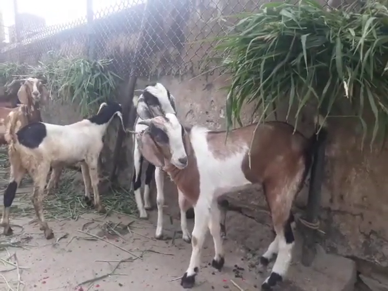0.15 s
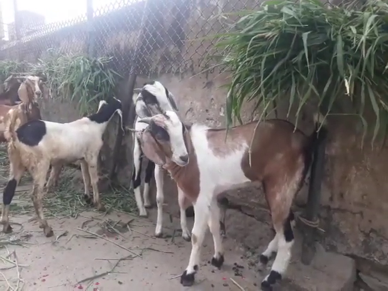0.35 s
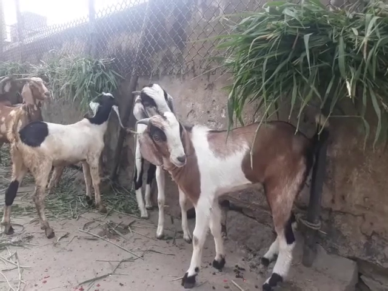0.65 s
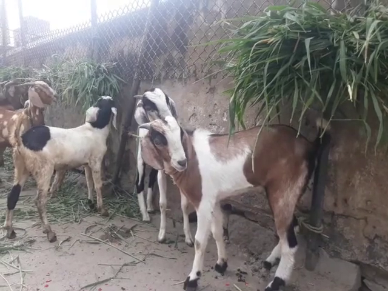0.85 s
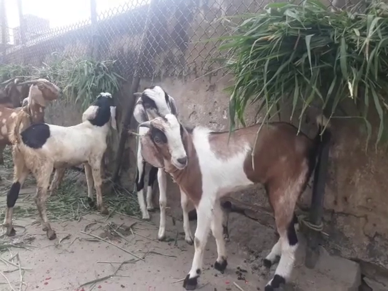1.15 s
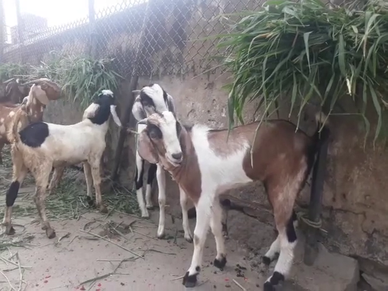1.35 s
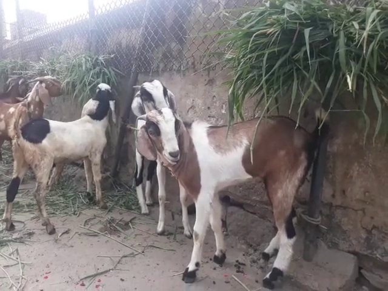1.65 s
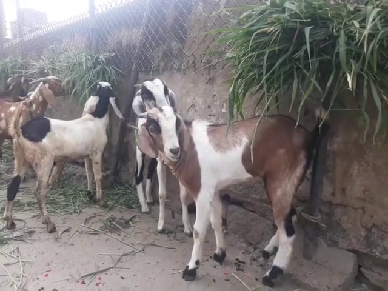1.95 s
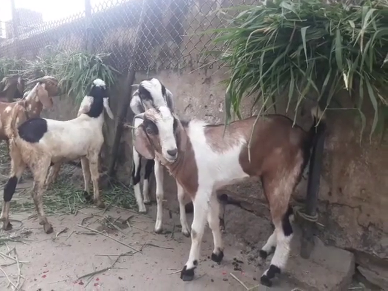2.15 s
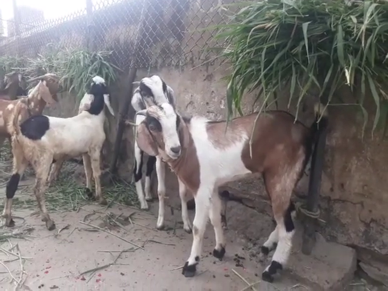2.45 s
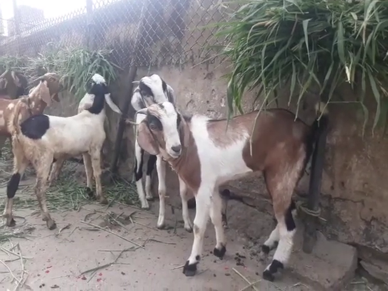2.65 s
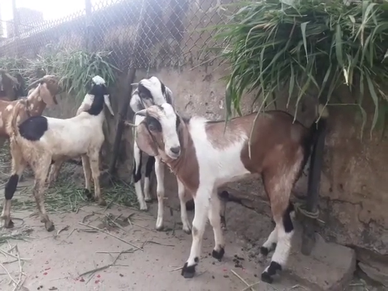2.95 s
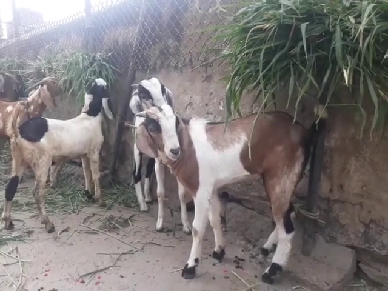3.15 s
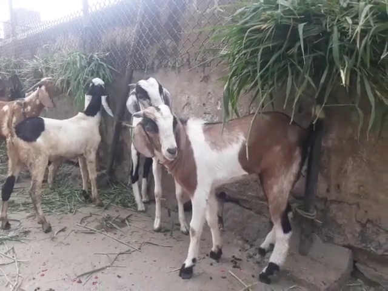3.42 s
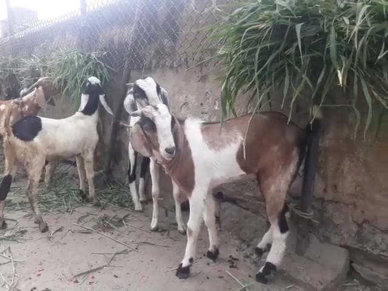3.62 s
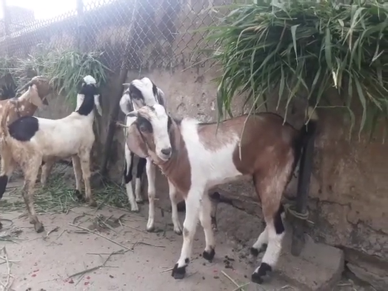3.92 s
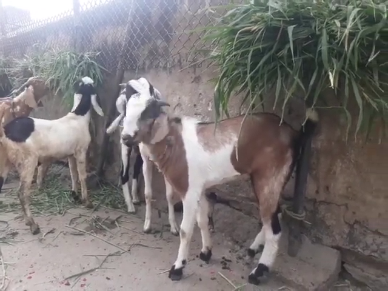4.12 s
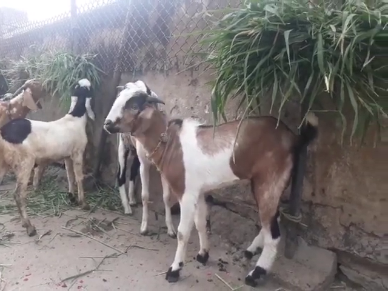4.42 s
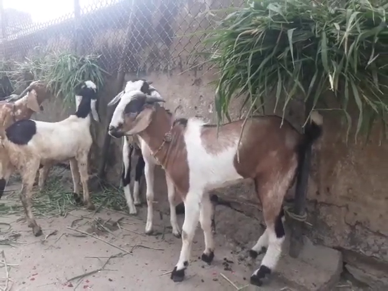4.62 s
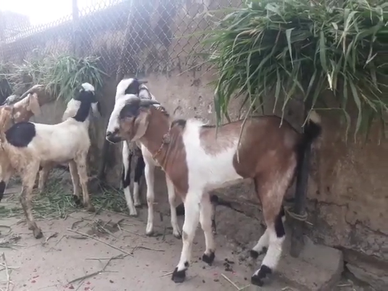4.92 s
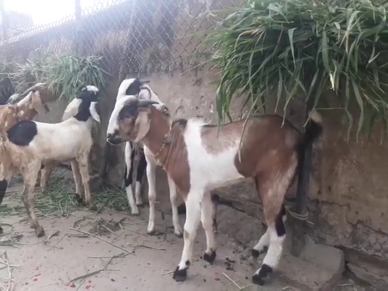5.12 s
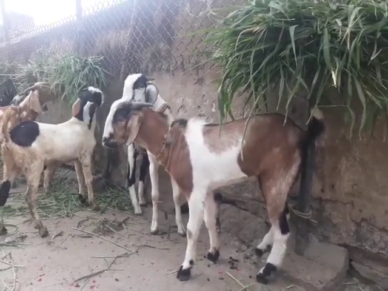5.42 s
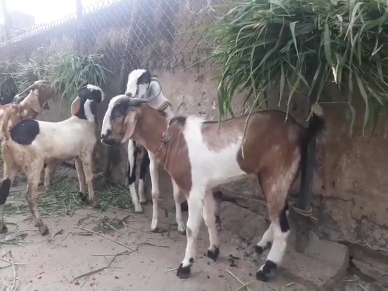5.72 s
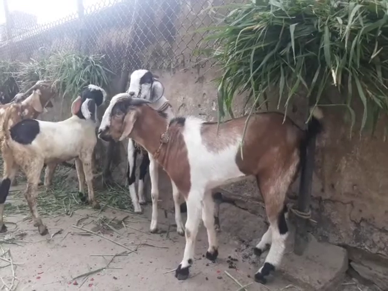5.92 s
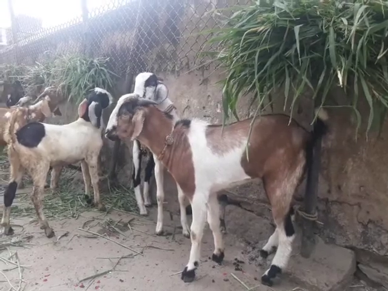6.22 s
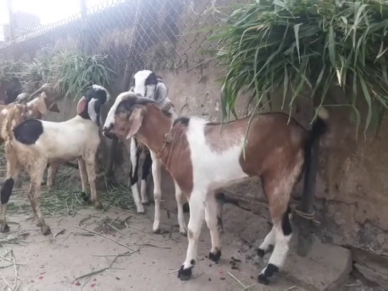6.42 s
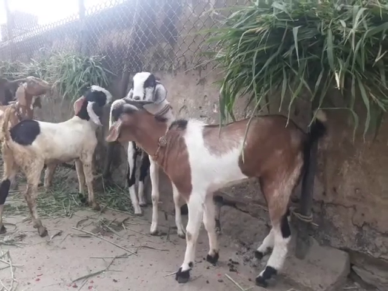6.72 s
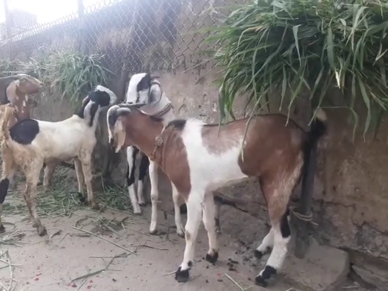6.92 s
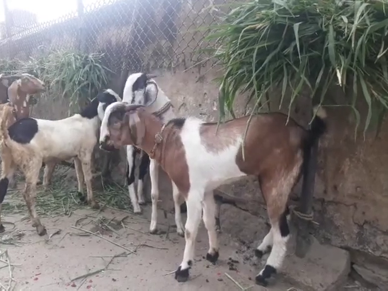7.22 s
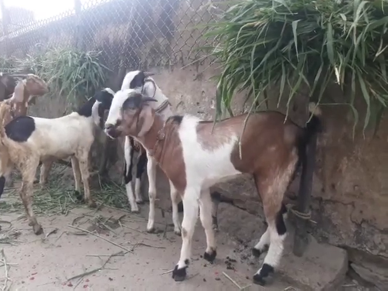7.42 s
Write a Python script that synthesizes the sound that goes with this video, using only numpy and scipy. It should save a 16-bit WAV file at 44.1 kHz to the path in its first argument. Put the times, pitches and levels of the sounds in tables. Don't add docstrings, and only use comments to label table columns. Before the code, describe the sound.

In a walled goat pen, a loud trembling bleat gives way to twig snaps and broom scratches, ending with rattling board knocks and another bleat.

```python
import sys
import numpy as np
from scipy import signal
from scipy.fft import rfft, irfft, next_fast_len
from scipy.io import wavfile
from scipy.ndimage import uniform_filter1d, minimum_filter1d

SR = 44100
rng = np.random.default_rng(int(sys.argv[2]) if len(sys.argv) > 2 else 0)


def linear_from_db(decibels):
    return 10 ** (np.asarray(decibels, float) / 20)


def transcribe(u):
    v = np.clip(np.atleast_2d(u).T, -1, 1)
    q = np.round(v * 32767).astype(np.int16)
    wavfile.write(sys.argv[1], SR, q)


N = 333341

# t/s, gain level/dB
GAIN = [(0, 7.5), (.06, 0.5), (.5, 1), (1.0, 1.5), (1.25, 1.5), (1.5, -6.5), (2.13, -15), (2.4, -14),
        (2.78, -14), (2.97, -4.5), (3.33, -1), (4.3, -1.5), (4.6, -1), (5.9, 1), (6.36, -0.5), (6.8, 1),
        (7.15, -0.5), (7.4, 0)]
# f/Hz, level per Hz/dB
RUMBLE_COLOUR = [(82, -14.5), (140, -1.5), (253, -9.5), (381, -10), (451, -13.5), (688, -13), (795, -14),
                 (1180, -17.5), (1700, -22), (2500, -28), (3250, -35), (5500, -120)]
HISS_COLOUR = [(880, -23), (1500, -10.5), (1680, -15.5), (2140, -9.5), (3270, -1), (3850, 5), (6020, -8),
               (7830, -3.5), (8330, -5.5), (9500, -31.5), (12400, -18), (20900, -120)]
SPRAY_COLOUR = [(4000, -19.5), (5500, -5.5), (6900, -7), (7600, 2.5), (8300, -2), (9600, -15.5),
                (12800, -12), (15000, -11.5), (15800, -10), (16200, -32)]
ENGINE_COLOUR = [(28, -46), (42, -10), (65, -1), (82, -28.5), (108, 9), (125, 0), (160, -29.5)]

# start t/s, length/s, f/Hz, level/dB
RINGS = [(.001, 0.48, 452.5, -48.5), (.01, 0.18, 679, -52), (1.79, 0.23, 1357, -65),
         (3.39, 0.35, 3196, -53.5), (3.62, 0.58, 3200, -54.5), (4.0, 0.29, 3170, -51),
         (4.85, 0.31, 1300, -61), (5.112, 0.026, 3290, -45)]
# start t/s, length/s, top f/Hz, level/dB
CHIRPS = [
    (2.645, 0.029, 5300, -50),
    (2.878, 0.024, 7240, -49),
    (4.057, 0.027, 5270, -38.5),
]
# start t/s, length/s, start f/Hz, end f/Hz, level/dB
SQUEAKS = [
    (5.928, 0.019, 1215, 1380, -31.5),
    (5.93, 0.023, 2390, 2800, -38),
    (5.946, 0.02, 1510, 2040, -36.5),
    (5.945, .016, 3010, 3870, -37),
]

# t/s, peak level/dB
THICK_TWIGS = [(.818, -36), (2.1176, -33), (2.928, -29), (.984, -15), (2.7994, -36), (2.8344, -38),
               (3.3857, -21.5), (3.6044, -54), (4.4014, -25), (4.6977, -13), (4.7207, -16), (4.7406, -12.5),
               (5.9005, -15), (6.3964, -19)]
THIN_TWIGS = [(2.5094, -43), (2.7492, -35), (2.7836, -33), (3.3644, -27), (3.4862, -13), (3.8214, -25),
              (4.1764, -26), (4.2705, -29.5), (5.9286, -16)]
STRAW = [(.008, -23.5), (.165, -35), (.2678, -46), (.3277, -33), (.4204, -30), (.4798, -34), (.6025, -36),
         (.7357, -34), (.7786, -31), (.814, -33), (.8836, -29), (.9832, -36.5), (2.7495, -49),
         (2.7824, -43), (2.7994, -37), (3.3857, -32), (4.4014, -38), (4.6977, -16), (4.7406, -30.5),
         (3.604, -31), (3.645, -39), (3.824, -30), (3.933, -37), (2.1176, -50),
         (2.9744, -45), (3.1198, -27), (3.1544, -24), (3.1694, -33), (3.2999, -41), (3.3144, -41),
         (3.3214, -38), (3.3568, -37), (3.4994, -35), (3.5244, -37), (3.5644, -44), (4.5141, -36),
         (4.7207, -27)]
# t/s, peak level/dB, f/Hz
HOOVES = [(4.697, -25, 1990), (4.743, -23.5, 1270), (4.759, -27, 1110), (5.129, -40, 1300),
          (5.28, -37, 1230), (5.384, -25.5, 1320), (5.476, -31, 1270), (5.561, -35, 1290), (5.79, -37, 790),
          (6.078, -16.5, 1390), (6.459, -20, 2560), (6.468, -30, 1230)]

# start t/s, length/s, start f/Hz, end f/Hz, level/dB
RASPS = [(0.486, 0.091, 4590, 3730, -21.5), (5.42, 0.14, 3860, 3660, -26),
         (5.464, 0.065, 4230, 4500, -23.5), (5.521, .08, 4400, 4300, -31.5), (2.93, .05, 7000, 7000, -42),
         (3.09, 0.12, 4100, 3940, -32), (3.675, 0.053, 7200, 7300, -32), (3.687, 0.056, 5900, 5700, -27),
         (3.825, 0.063, 7200, 7400, -30), (5.3, 0.054, 6700, 7700, -28), (4.775, 0.037, 7000, 7100, -28)]
# start t/s, full-pressure length/s, level near 4 kHz/dB, level near 7 kHz/dB, top level/dB
SWEEPS = [(1.808, 0.046, -37, -36, -65.5), (1.952, 0.07, -37.5, -39.5, -60),
          (2.119, 0.049, -37, -38.5, -73), (2.933, 0.044, -32.5, -29, -53),
          (3.102, 0.068, -26.5, -28.5, -34.5), (3.298, .062, -65, -60, -44), (3.489, 0.024, -46, -41, -35),
          (3.68, 0.069, -29, -23.5, -43), (3.819, 0.047, -27.5, -22, -41), (4.768, 0.05, -27, -24, -51),
          (5.298, 0.075, -29, -25.5, -45), (5.433, 0.14, -27, -47, -60), (5.918, 0.06, -34.5, -37, -29.5)]
# f/Hz, level per Hz/dB
BRISTLE_LOW = [(1500, -35.5), (2800, -12), (3300, -2.5), (4100, 3.5), (4900, -2.5), (6500, -32),
               (12000, -50)]
BRISTLE_HIGH = [(2000, -29), (4000, -21), (5400, -5.5), (7200, 0), (8300, -9), (9300, -25), (12000, -37),
                (16000, -60)]
BRISTLE_TOP = [(1000, -23), (2500, -14), (8000, 3), (10000, -10), (13000, -7), (15800, -11), (16500, -40)]

# t/s, level/dB, brightness/dB, bass/dB, ring time/factor
KNOCKS = [
    (.004, -26, -11.5, 0.5, 0.53),
    (1.909, -47.5, 5, 0.5, 1.64),
    (6.643, -12, 6, 4, 0.95),
    (7.088, -7.5, 1.5, -2, 0.93),
    (7.451, -5, -3, -4, 0.85),
]
SLAP_DB = [
    -41,
    -60.5,
    -2,
    1.5,
    -1,
]
# delay t/s, f/Hz, width/Hz, level/dB
REBOUNDS = [(.0025, 800, 500, -11.5), (.0045, 330, 170, 0), (.0085, 1500, 900, -4), (.017, 300, 200, -0.5),
            (0.0231, 420, 260, -3), (.003, 198.4, 20, -11.5), (.004, 351, 23, -13)]
# f/Hz, level per Hz/dB
BOARD_COLOUR = [(18, -54.5), (76, -9), (173, 2.5), (246, -1), (317, 2.5), (1320, -21.5), (1620, -23),
                (2130, -34.5), (3690, -37), (8030, -50.5), (12000, -63), (15600, -79), (22000, -120)]
# f/Hz, t/s
BOARD_T60 = [(60, 0.59), (160, 0.47), (420, 0.39), (1100, 0.52), (2500, 0.73), (8000, 0.15)]
# f/Hz, width/Hz, level/dB
BOARD_MODES = [(129, 27, -1.5), (196, 18, 4), (296, 40, 1.5), (355, 30, 3.5), (437, 30, -27),
               (654, 35, 0.5)]

# t/s, pitch f/Hz, mouth opening/0-1, tongue lift of the mode near 3 kHz/share
FAR_PITCH = [(.06, 409.5, 0.2, .01), (.19, 408.6, 0.33, .01), (.28, 422.6, 0.77, .01),
             (.47, 440.7, 0.72, .01), (.72, 394, 0.52, 0.0085)]
NEAR_PITCH = [(.9, 220.1, 0.46, 0.17), (1.0, 272.4, 0.25, 0.061), (1.07, 284, 0.26, 0.026),
              (1.19, 304.6, 0.05, 0.018), (1.325, 294.2, 0, 0.0045), (1.39, 316.5, 0.83, 0.0012),
              (1.55, 320.7, 1, 0.014), (1.715, 309.7, 0.96, 0.013), (1.79, 245.4, 0.26, 0.022)]
LAST_PITCH = [(6.92, 270, 0.046, .03), (6.96, 267, 0.067, 0.046), (7.05, 296.9, 0.033, 0.0079),
              (7.15, 308.1, 0.18, 0.029), (7.26, 314.4, .15, -0.012), (7.31, 309.2, 1, -0.036),
              (7.375, 315.8, 0.95, -0.029), (7.42, 300, 0.85, 0.043), (7.555, 292.4, 0.38, .02)]
# t/s, pitch f/Hz
NEAR_TUNE = [
    [(0.99, 258), (1.008, 282.3), (1.066, 282.3), (1.092, 296), (1.1, 312.3), (1.122, 316), (1.136, 275.7),
     (1.15, 280.5)],
    [(1.16, 297), (1.188, 320.8), (1.2, 305.5), (1.224, 331), (1.244, 298.2), (1.292, 306), (1.316, 293.6),
     (1.33, 294)],
    [(1.34, 301), (1.35, 299.4), (1.378, 316.6), (1.418, 310.7), (1.438, 334), (1.462, 307), (1.482, 332.7),
     (1.5, 313)],
    [(1.51, 309.4), (1.534, 341.7), (1.546, 325.8), (1.576, 324), (1.606, 310), (1.626, 332.4),
     (1.64, 311.5), (1.66, 315)],
    [(1.67, 311.4), (1.684, 317.8), (1.7, 296), (1.71, 309.5), (1.718, 306.8), (1.776, 244.5),
     (1.79, 246.6)],
]
LAST_TUNE = [
    [(6.92, 270), (6.98, 272.7), (6.998, 311.2), (7.006, 294.2), (7.075, 296)],
    [(7.13, 296.5), (7.15, 308), (7.18, 298)],
    [(7.21, 309), (7.22, 307.5), (7.23, 318.3), (7.29, 304.5), (7.3, 314.5)],
    [(7.31, 305.5), (7.38, 317.8), (7.42, 296), (7.44, 299)],
    [(7.51, 308.6), (7.54, 291), (7.55, 292.6)],
]
# start t/s, length/s, level/dB, level of the gap after/dB
FAR_QUAVERS = [(0.088, 0.027, -31, -47.5), (0.169, 0.035, -31.5, -48.5), (0.259, 0.031, -28, -38.5),
               (0.357, 0.035, -26, -35.5), (0.446, 0.039, -26, -34.5), (0.544, 0.0273, -29, -35),
               (0.64, 0.022, -30.5, -39.5)]
NEAR_QUAVERS = [(0.918, 0.027, -30, -42), (.985, 0.013, -27, -15.5), (1.007, 0.027, -12, -32),
                (1.052, 0.019, -23, -24), (1.093, 0.012, -12, -21), (1.121, 0.016, -11.5, -35.5),
                (1.17, 0.029, -9.5, -15.5), (1.21, 0.011, -7, -23.5), (1.261, 0.048, -9.5, -18),
                (1.343, 0.067, -8.5, -22), (1.427, 0.079, -8, -20), (1.531, 0.064, -7, -24),
                (1.616, 0.0068, -15.5, -15.5), (1.647, 0.038, -8.5, -31.5), (1.712, 0.021, -22, -30),
                (1.75, 0.01, -30.5, -48)]
LAST_QUAVERS = [(6.936, 0.031, -28.5, -36.5), (7.041, 0.026, -21, -32.5), (7.14, 0.033, -20.5, -36.5),
                (7.23, 0.032, -21, -31), (7.32, 0.04, -12, -27), (7.423, 0.0347, -16, -37),
                (7.529, 0.017, -21, -28)]
# f/Hz mouth narrow, f/Hz mouth wide, width/Hz, level/dB narrow, level/dB wide
FAR_THROAT = [(880, 940, 420, -24, -14.5), (1950, 2070, 125, -9, -3.5), (3300, 3220, 380, -2, -2.5),
              (3800, 4620, 470, 9, 1.5), (5170, 5500, 510, -13, -5), (6900, 6540, 630, 5, -12),
              (8100, 7700, 630, -15, -8.5)]
NEAR_THROAT = [(370, 526, 130, -15.5, -27), (1240, 1130, 236, -22.5, -31), (1540, 1560, 96, -21.5, -36),
               (2157, 2204, 183, -9, -18), (3265, 3100, 350, -1.5, -9), (4110, 3845, 306, -7.5, -1),
               (4870, 4740, 450, -12.5, -11), (5540, 5700, 270, -18, -18.5), (6580, 6650, 230, -29, -16),
               (8210, 7800, 910, -27.5, -29), (10100, 9800, 800, -43, -50.5), (11300, 10840, 560, -35, -40),
               (13100, 12000, 930, -42.5, -44.5), (15100, 15100, 900, -36, -44.5)]
LAST_THROAT = [(550, 689, 210, -11, -45), (1190, 1350, 195, -2, -20), (2194, 2090, 220, 2.5, -13),
               (3200, 3070, 415, 6.5, -9.5), (4160, 3930, 257, 3.5, 6), (4920, 4840, 550, -2, 1),
               (7000, 6470, 240, -12, -3.5), (8260, 8000, 940, -10.5, -9), (10900, 11000, 580, -23, -23),
               (12670, 12800, 750, -31, -36), (15060, 14300, 1000, -26, -35)]
# f/Hz, width/Hz, depth/0-1 mouth narrow, depth/0-1 mouth wide
NOSE = [(4700, 190, 0.7, .2), (1800, 280, 0, 0.57), (2670, 190, 0, 0.28)]
# delay t/s, level/dB
ECHOES = [(.0013, -23), (.0047, -13.5), (.009, -22), (.015, -18.5), (0.022, -26)]


def evened(x):
    return x / np.sqrt(np.mean(x ** 2) + 1e-20)


def drift(size, *spans):
    x = rng.standard_normal(size)
    for span in spans:
        x = uniform_filter1d(x, size=span)
    return evened(x)


def read(points, hz):
    f, value = np.transpose(points)
    return np.interp(np.log(hz + 1), np.log(f + 1), value)


def add(mix, s, sound):
    part = mix[round(max(s, 0) * SR):][:len(sound)]
    part += sound[:len(part)]


def resonate(x, hz, *widths):
    turn = np.exp(2j * np.pi * np.cumsum(hz * np.ones(len(x))) / SR)
    z = x / turn
    for r in np.exp(-np.pi * np.abs(widths) / SR):
        z = signal.lfilter([1 - r], [1, -r], z)
    return 2 * (turn * z).real


def coloured(points, x):
    hz = np.fft.rfftfreq(len(x), 1 / SR)
    return evened(irfft(rfft(x) * linear_from_db(read(points, hz)), len(x)))


def patchy_noise(points, patchy_db):
    hop = 64
    hz = np.fft.rfftfreq(256, 1 / SR)[:, None]
    a, b, patches = rng.standard_normal((N // hop + 5, len(hz), 3)).T
    patches = uniform_filter1d(patches, size=5, axis=0)
    patches = evened(uniform_filter1d(patches, size=30, axis=1))
    z = (a + 1j * b) * linear_from_db(read(points, hz) + patchy_db * patches)
    return evened(signal.istft(z, nperseg=256, noverlap=256 - hop)[1][:N])


def rumble(gain_db):
    return coloured(RUMBLE_COLOUR, rng.standard_normal(N)) * linear_from_db(-44 + gain_db)


def hiss(gain_db):
    return patchy_noise(HISS_COLOUR, 1.4) * linear_from_db(-40 + 1.34 * gain_db)


def water(t, gain_db):
    trickle_db, spray_db, opens_s, turn_s = -52, -34.5, 4.416, 0.28
    opening = np.sqrt(np.clip((t - opens_s) / turn_s, 0, 1))
    water_db = trickle_db + (spray_db - trickle_db) * opening
    return patchy_noise(SPRAY_COLOUR, 2.2) * linear_from_db(water_db + 0.71 * gain_db)


def engine(t, gain_db):
    leaves_s, fade_db_per_s, far_db = 4.93, -18, -15
    away_db = np.clip((t - leaves_s) * fade_db_per_s, far_db, 0)
    return coloured(ENGINE_COLOUR, rng.standard_normal(N)) * linear_from_db(-47.5 + away_db + 1.2 * gain_db)


def yard():
    t = np.arange(N) / SR
    gain_db = np.interp(t, *np.transpose(GAIN))
    return rumble(gain_db) + hiss(gain_db) + water(t, gain_db) + engine(t, gain_db)


def bending_tone(length, hz0, hz1, hz2, db, flutter_db):
    u = np.linspace(-1, 1, round(length * SR))
    hz = hz1 + (hz2 - hz0) / 2 * u + ((hz0 + hz2) / 2 - hz1) * u ** 2
    flutter = linear_from_db(flutter_db * drift(len(u), 300))
    tone = np.sqrt(2) * np.sin(2 * np.pi * np.cumsum(hz) / SR)
    return linear_from_db(db - 28.4 * length * u) * flutter * tone * signal.windows.tukey(len(u), .4)


def pail_and_wire():
    out = np.zeros(N)
    for s, length, hz, db in RINGS:
        add(out, s, bending_tone(length, hz, hz, hz, db, 2.5))
    return out


def sparrows():
    out = np.zeros(N)
    for s, length, hz, db in CHIRPS:
        add(out, s, bending_tone(length, .88 * hz, hz, 0.64 * hz, db, 3.5))
    return out


def hinge():
    out = np.zeros(N)
    for s, length, hz0, hz2, db in SQUEAKS:
        add(out, s, bending_tone(length, hz0, np.sqrt(hz0 * hz2), hz2, db, 2.5))
    return out


def snap(db, hz, width, decay_s):
    t = np.arange(1300) / SR
    crack = 1.3 * np.exp(-t / .0007)
    burst = rng.standard_normal(len(t)) * (np.exp(-t / decay_s) + crack)
    sound = resonate(burst, hz, width, 0.63 * width)
    return linear_from_db(db - 2.5) * sound / abs(sound).max()


def twigs_and_straw():
    out = np.zeros(N)
    kinds = [(THICK_TWIGS, 4430, 2900), (THIN_TWIGS, 8040, 1900), (STRAW, 11400, 6500)]
    for table, hz, width in kinds:
        for s, db in table:
            add(out, s, snap(db, hz, width, 0.0061))
    return out


def hooves():
    out = np.zeros(N)
    for s, db, hz in HOOVES:
        width = 0.95 * hz * linear_from_db(1.1 * (db + 25.0))
        add(out, s, snap(db, hz, width, 0.01))
    return out


def rasps():
    out, width = np.zeros(N), 350
    for s, length, hz0, hz1, db in RASPS:
        u = np.linspace(0, 1.5, round(1.3 * length * SR))
        hz = hz0 + (hz1 - hz0) * np.minimum(u, 1)
        scrape = evened(resonate(rng.standard_normal(len(u)), hz, width, 1.3 * width))
        add(out, s, scrape * linear_from_db(db - 8.5 * u ** 2) * signal.windows.tukey(len(u), .45))
    return out


def broom():
    out, t = np.zeros(N), np.arange(SR // 2) / SR
    t60_s = 0.52
    for s, length, low_db, high_db, top_db in SWEEPS:
        grains = rng.standard_normal(len(t)) * linear_from_db(1.1 * drift(len(t), 90))
        low = coloured(BRISTLE_LOW, grains)
        high = coloured(BRISTLE_HIGH, grains)
        top = coloured(BRISTLE_TOP, grains)
        low = low + 0.23 * evened(resonate(grains, 3950, 750, 1050))
        fine_db = np.interp(t, [0, .028, .036, .025 + length, 0.037 + length], [-3, -2, 1.5, -1.5, -4])
        top = top * linear_from_db(fine_db + 2.0 * drift(len(t), 250))
        press_at = [0, .03, 0.0026 + length, 0.01 + length + t60_s]
        press_db = np.interp(t, press_at, [-18.5, -3.5, -4.0, -73.0])
        stroke = linear_from_db(low_db) * low + linear_from_db(high_db) * high + linear_from_db(top_db) * top
        add(out, s - .015, linear_from_db(press_db) * stroke)
    return out


def board_body(bright_db, bass_db, ring):
    size = SR // 2
    hz, t = np.fft.rfftfreq(size, 1 / SR), np.arange(size) / SR
    bounce = 1.7 * np.exp(-((t - .02) / 0.00036) ** 2)
    shake = rng.standard_normal(size) * (1 + 0.4 * np.exp(-t / 0.0074) + bounce)
    modes = evened(sum(linear_from_db(db) * evened(resonate(shake, f, width)) for f, width, db in BOARD_MODES))
    modes = coloured([(30, -16), (90, 6.5), (700, 0.0), (1500, -43)], modes)
    z = rfft(coloured(BOARD_COLOUR, shake) + 0.32 * modes)
    z = z * linear_from_db(bright_db * np.log2(1 + hz / 500) + bass_db / (1 + (hz / 200) ** 4))
    body = np.zeros(size)
    edges = np.geomspace(30, 16000, num=12)
    for lo, hi in zip(edges, edges[1:]):
        band = irfft(z * ((hz >= lo) & (hz < hi)), size)
        band = band * linear_from_db(-60 * t / (ring * read(BOARD_T60, lo)))
        if 600 < lo < 3000:
            band = band * np.clip(.4 + t / .012, 0, 1)
        body += band
    return body * np.clip(t / .004, 0, 1)


def post_slap(hz, width, db):
    t = np.arange(6000) / SR
    swell = 1 - np.exp(-t * hz * 9)
    return linear_from_db(db) * np.sin(2 * np.pi * hz * t) * np.exp(-np.pi * width * t) * swell


def knocks():
    out = np.zeros(N)
    for s, db, bright_db, bass_db, ring, slap_db in np.c_[KNOCKS, SLAP_DB]:
        add(out, s, linear_from_db(db - 2.5) * board_body(bright_db, bass_db, ring))
        for delay, hz, width, rebound_db in REBOUNDS:
            add(out, s + delay * rng.uniform(.93, 1.07), post_slap(hz, width, slap_db + rebound_db))
    return out


def breath(t, quavers, rise, fall, slope_db):
    start, length, db, gap_db = np.transpose(quavers)
    before_db = np.r_[db[0] - 22, gap_db[:-1]]
    corners = np.c_[start - rise, start, start + length, start + length + fall].ravel()
    levels = np.c_[before_db, db - slope_db, db + slope_db, gap_db].ravel()
    return np.interp(t, np.maximum.accumulate(corners), levels)


def throat_pulses(t, hz, mouth, push_db, rough, jitter, shimmer_db, arch, waver):
    wobble = drift(len(t), 250)
    wander = drift(len(t), 700, 700)
    late_push_db = np.interp(t - .008, t, push_db)
    turns = np.cumsum(hz * (1 + arch * late_push_db + jitter * rough * wobble + waver * wander)) / SR
    nearest = np.round(turns).astype(int)
    top, half = int(17500 / hz.max()), np.pi * turns + 1e-7
    folds = np.sin((2 * top + 1) * half) / np.sin(half) - 1
    doubling = 2.0 + (1.3 - 2.0) * mouth
    pairs = doubling * ((-1) ** nearest - 1) / 2
    strength = np.minimum(rng.standard_normal(1000)[nearest] + pairs + .5, 1.1)
    puffs = np.exp(-(turns % 1) / 0.17) * rng.standard_normal(len(t))
    return (evened(folds) + .22 * rough * evened(puffs)) * linear_from_db(shimmer_db * rough * strength)


def throat_and_nose(t, drive, throat, mouth, lift, push_db):
    voice, knots = 0, len(t) // 900
    for k, (hz0, hz1, width, db0, db1) in enumerate(throat):
        centre = (hz0 + (hz1 - hz0) * mouth) * (1 + lift * (2700 < hz0 < 3600))
        ring = resonate(drive, centre, 1.17 * width, 3.23 * width, 4 * width)
        low_share = 0.5 * (hz0 < 2500) + 0.44 * (800 < hz0 < 1800)
        top_share = 0.28 * (hz0 > 7500) + 0.32 * (hz0 > 9000)
        chest_db = push_db * (low_share + top_share)
        tongue = np.interp(t, np.linspace(t[0], t[-1], knots), rng.standard_normal(knots))
        tongue_db = (3.05 + 1.0 * (hz0 > 7500)) * tongue
        voice = voice + (-1) ** k * linear_from_db(db0 + (db1 - db0) * mouth + chest_db + tongue_db) * ring
    for hz, width, narrow, wide in NOSE:
        depth = np.clip(narrow + (wide - narrow) * mouth, 0, 1)
        voice = voice - depth * resonate(voice, hz, width)
    return signal.sosfilt(signal.butter(4, 190, "highpass", fs=SR, output="sos"), voice)


def bleat(pitch, tune, quavers, throat, rough, jitter, shimmer_db, rise, fall, arch, slope_db, waver):
    s, hz, mouth, lift = np.transpose(pitch)
    t = np.arange(s[0] - .03, s[-1] + 0.036, 1 / SR)
    hz, lift = np.interp(t, s, hz), np.interp(t, s, lift)
    mouth = np.clip(np.interp(t, s, mouth), 0, 1)
    if tune:
        at, tune_hz = np.concatenate(tune).T
        hz = np.where(t < at[0], hz, np.interp(t, at, tune_hz))
    effort_db = breath(t, quavers, rise, fall, slope_db)
    push_db = uniform_filter1d(effort_db, size=900) - uniform_filter1d(effort_db, size=4500)
    narrow, wide, clears_s = rough
    clearing = np.where(t > clears_s, .35, 1)
    softness = linear_from_db(0.85 * np.minimum(push_db, 0))
    rough = np.clip((narrow + (wide - narrow) * mouth) * clearing * softness, 0, 1)
    drive = throat_pulses(t, hz, mouth, push_db, rough, jitter, shimmer_db, arch, waver)
    voice = throat_and_nose(t, drive, throat, mouth, lift, push_db)
    slow = np.sqrt(uniform_filter1d(voice ** 2, size=3000))
    return t[0], voice / slow * linear_from_db(effort_db) * signal.windows.tukey(len(t), .08)


def goats():
    out = np.zeros(N)
    add(out, *bleat(FAR_PITCH, [], FAR_QUAVERS, FAR_THROAT, rough=(.3, .36, 9), jitter=.065, shimmer_db=3.8,
                    rise=0.0304, fall=0.0195, arch=.013, slope_db=1.47, waver=.018))
    add(out, *bleat(NEAR_PITCH, NEAR_TUNE, NEAR_QUAVERS, NEAR_THROAT, rough=(.32, .31, 1.7), jitter=.055,
                    shimmer_db=6.4, rise=0.016, fall=0.011, arch=.001, slope_db=0.52, waver=.006))
    add(out, *bleat(LAST_PITCH, LAST_TUNE, LAST_QUAVERS, LAST_THROAT, rough=(.42, .4, 7.385), jitter=.045,
                    shimmer_db=5.0, rise=0.023, fall=0.009, arch=.001, slope_db=0.13, waver=.005))
    return out


def pen(x, t60_s, wet_db):
    t = np.arange(SR // 2) / SR
    sparse = rng.choice([-1., 1.], len(t)) * (rng.random(len(t)) < .05)
    tail = sparse * linear_from_db(-60 * t / t60_s) * (t > .02)
    taps = linear_from_db(wet_db) * tail / np.linalg.norm(tail)
    taps[0] = 1
    for delay, db in ECHOES:
        taps[round(delay * SR)] += linear_from_db(db)
    return signal.fftconvolve(x, taps)[:N]


def scene():
    background = yard() + pail_and_wire() + sparrows() + hinge()
    work = broom() + rasps() + knocks()
    animals = pen(goats() + twigs_and_straw() + hooves(), t60_s=0.33, wet_db=-13.0)
    mono = background + work + animals
    return np.array([mono, mono])


def roll_off(x):
    return signal.sosfilt(signal.butter(12, 16850, fs=SR, output="sos"), x)


def record(dry):
    over = np.maximum(abs(signal.hilbert(dry[0], next_fast_len(N))[:N]), 1)
    gain = uniform_filter1d(minimum_filter1d(1 / over, size=90), size=60)
    edge = signal.firwin(511, 15900, window=("kaiser", 9), fs=SR)
    dry = signal.sosfilt(signal.butter(4, 55, "highpass", fs=SR, output="sos"), dry)
    mix = signal.oaconvolve(dry * gain, edge[None], "same")
    return roll_off(mix)


dry = scene()
out = record(dry)
transcribe(out)
```